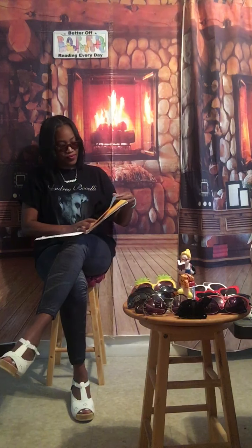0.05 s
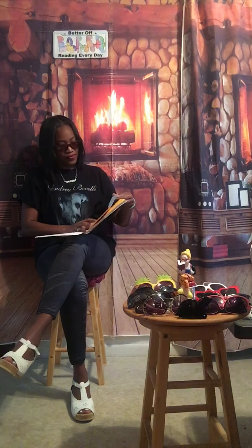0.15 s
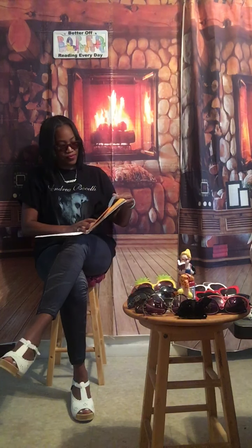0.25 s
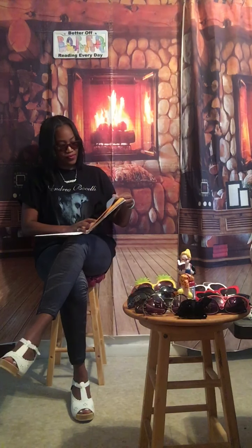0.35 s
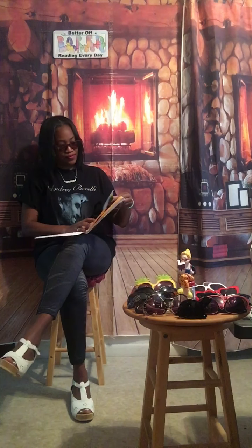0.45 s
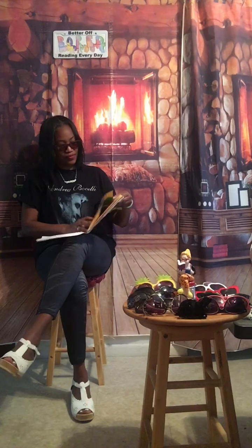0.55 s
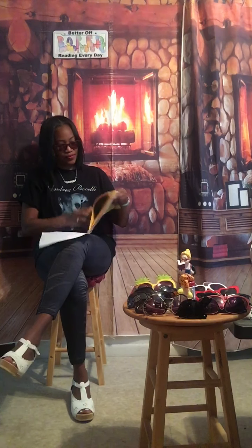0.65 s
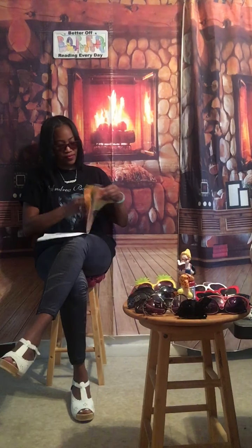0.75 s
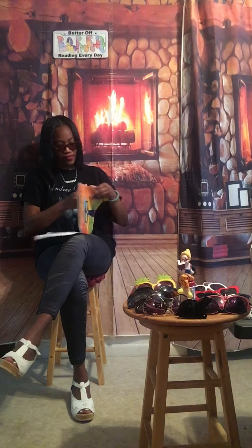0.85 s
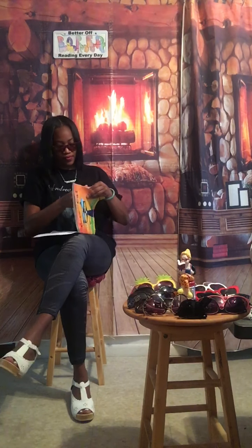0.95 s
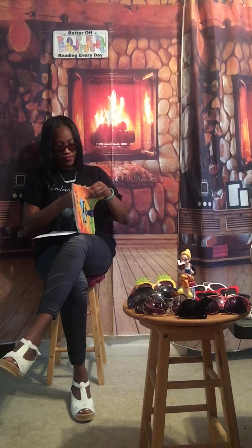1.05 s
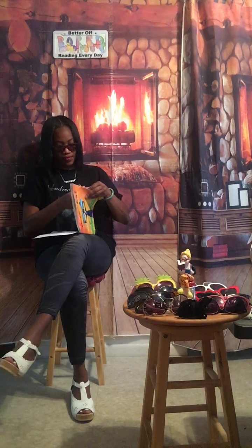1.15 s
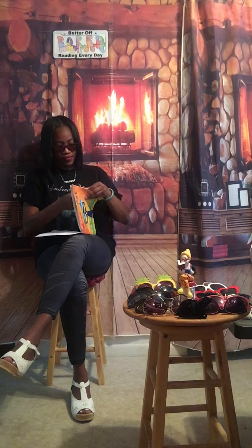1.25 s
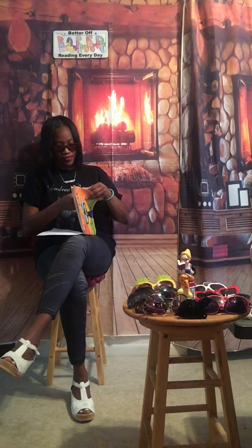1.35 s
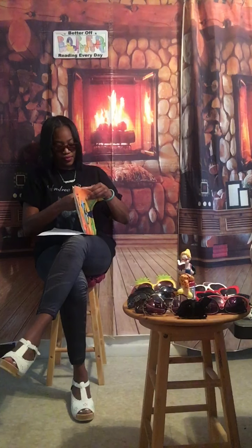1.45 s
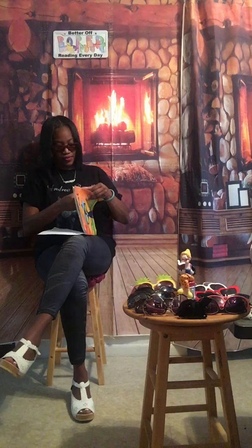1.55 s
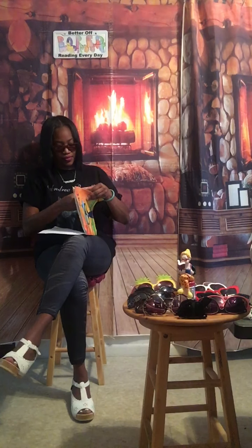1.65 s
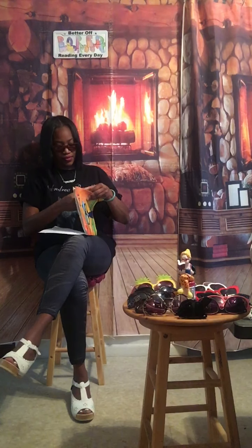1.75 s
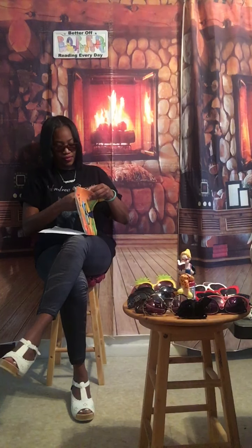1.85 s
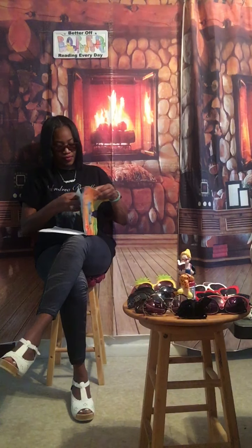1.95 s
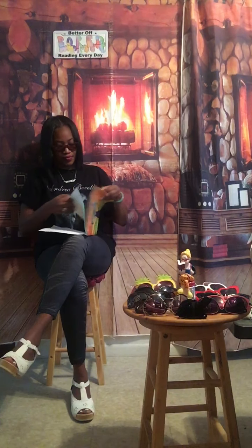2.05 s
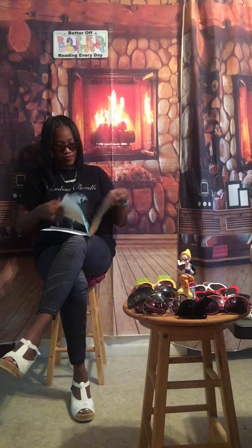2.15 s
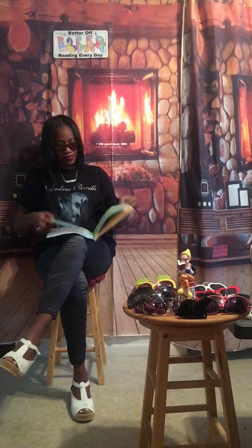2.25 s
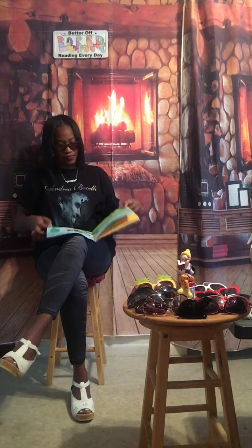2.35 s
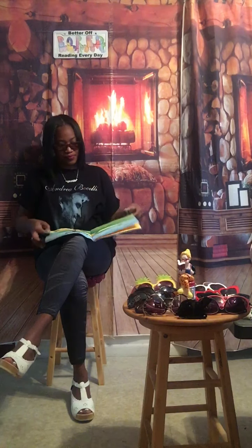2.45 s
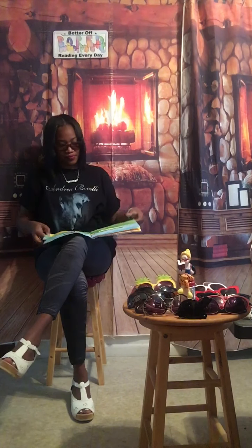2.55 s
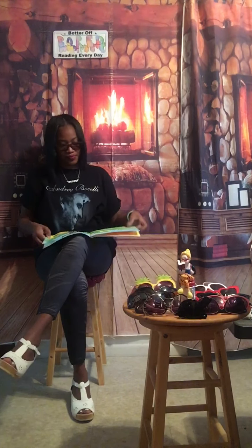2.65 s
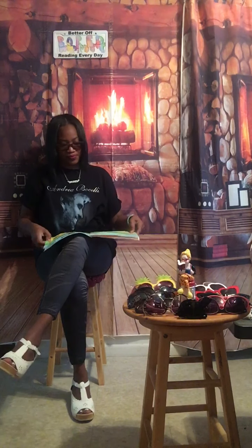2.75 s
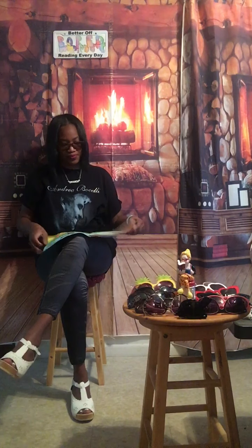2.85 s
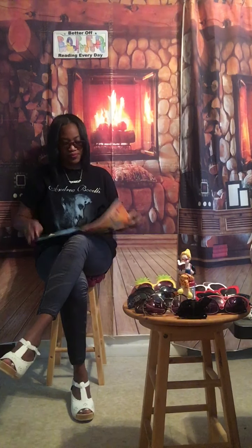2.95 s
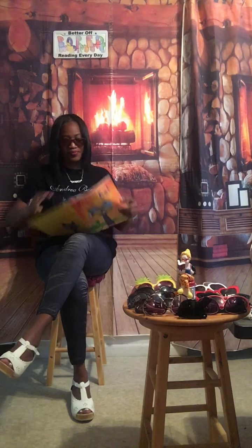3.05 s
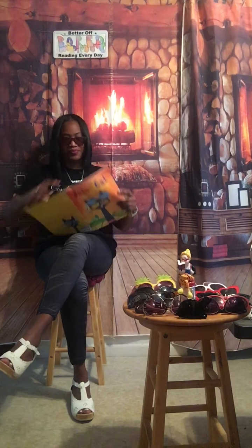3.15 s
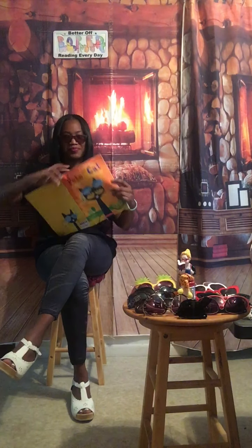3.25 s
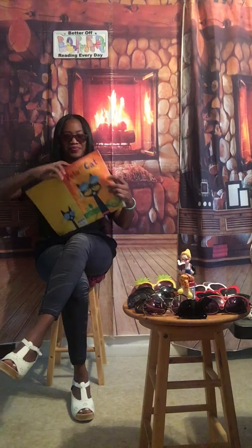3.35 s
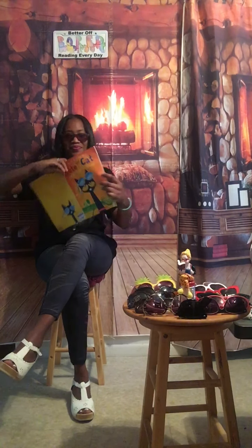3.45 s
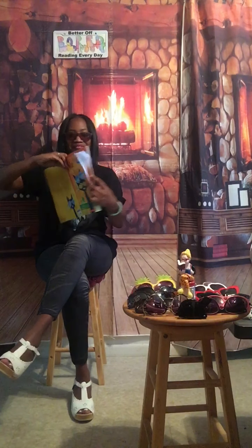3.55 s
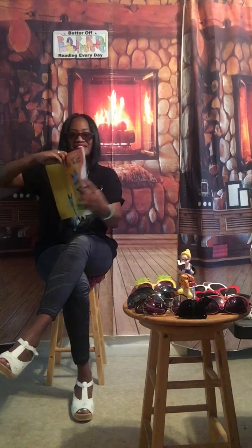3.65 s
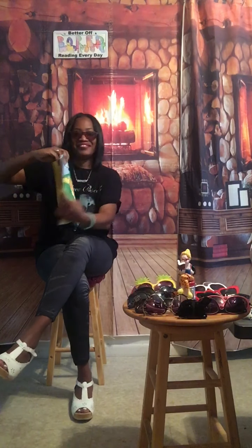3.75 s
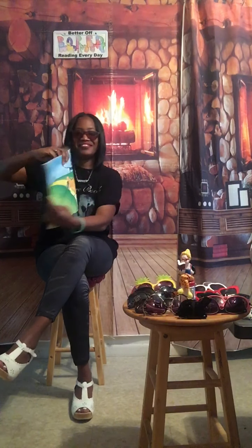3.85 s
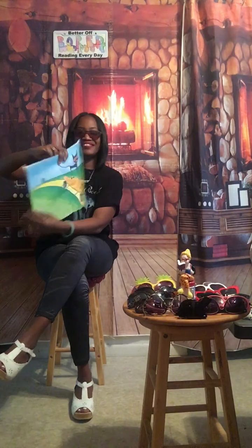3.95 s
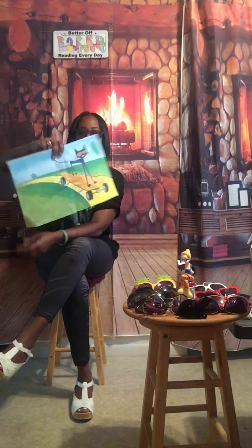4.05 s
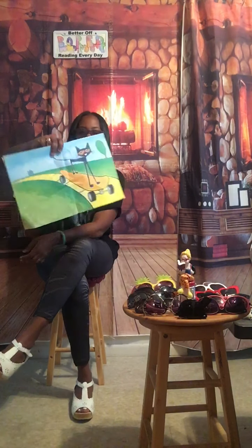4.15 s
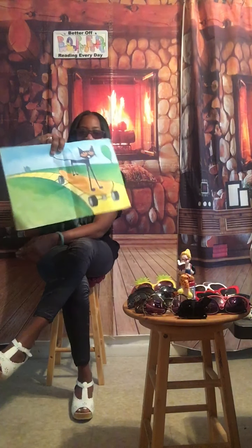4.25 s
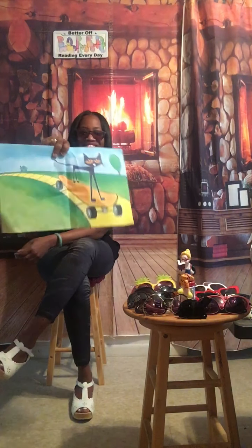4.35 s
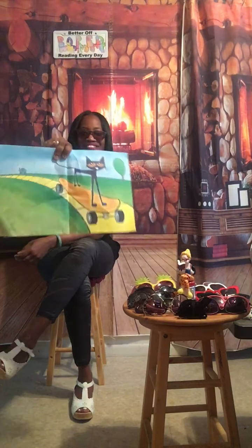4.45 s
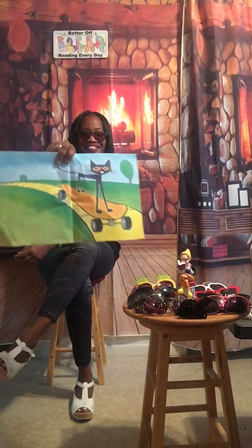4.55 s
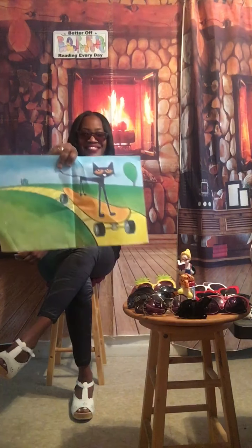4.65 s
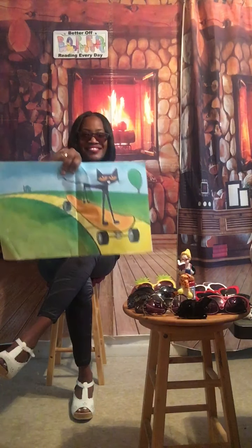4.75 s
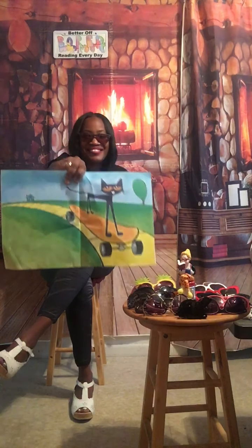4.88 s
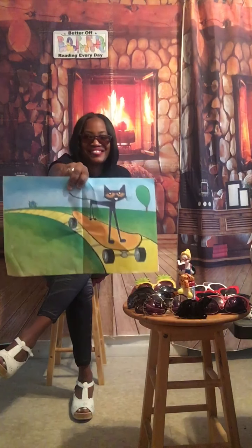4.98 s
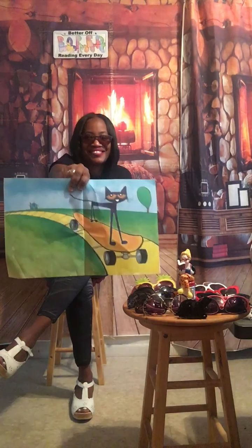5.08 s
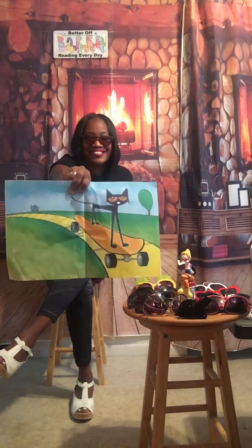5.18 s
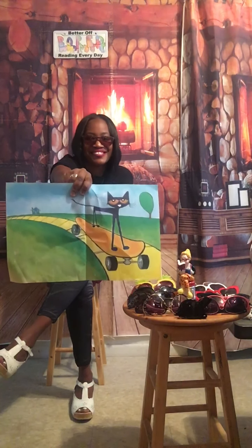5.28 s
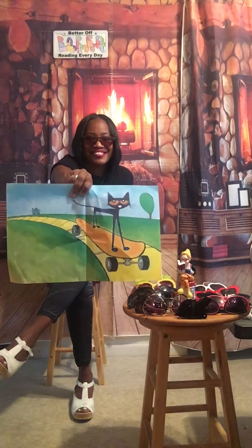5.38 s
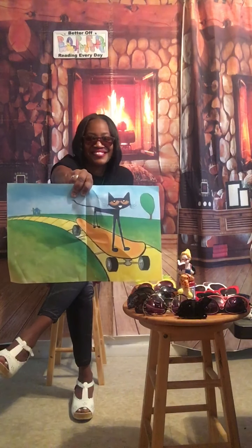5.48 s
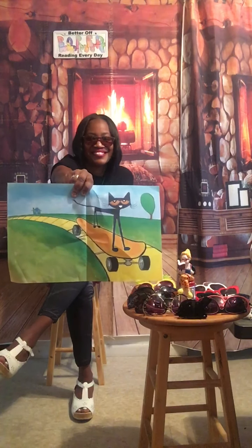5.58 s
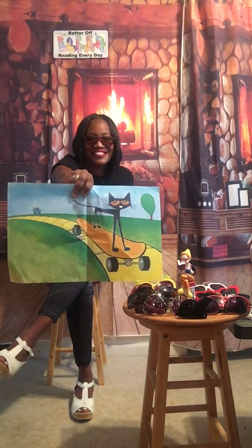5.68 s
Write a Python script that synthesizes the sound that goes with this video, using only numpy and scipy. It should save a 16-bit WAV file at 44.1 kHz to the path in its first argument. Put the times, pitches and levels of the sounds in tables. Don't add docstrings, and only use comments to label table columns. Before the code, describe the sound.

A stiff picture book is leafed through in a small furnished room, heard from a phone a few metres away. Under everything lie a faint distant engine, low mains hum and soft hiss; the engine drone slowly rises until about 2 s, drops, then idles with an uneven, beating level. Faint paper touches begin at 0.3 s, growing into a rustle and one sharp snap near 0.8 s. Only light rubbing follows until about 1.8 s, when a dense group of page snaps, papery sliding and dull cover knocks runs to 2.5 s, strongest around 2.0 to 2.3. More snaps with airy swishes come near 2.8, a fuller flap at 3.1, smaller ones at 3.4, 3.5 and 3.7, then a swelling slide and firm snap with knock at 4.0. A last small flick lands at 4.5, leaving hum and hiss to about 5.7 s. Reflections are short.

```python
import sys
import numpy as np
from scipy import signal
from scipy.fft import rfft, irfft, next_fast_len
from scipy.io import wavfile
from scipy.ndimage import uniform_filter1d

SR = 44100
rng = np.random.default_rng(int(sys.argv[2]) if len(sys.argv) > 2 else 0)


def makeup_ratio(level_db):
    decades = np.asarray(level_db, float) / 20
    return 10 ** decades


def master(y):
    cut = np.clip(np.atleast_2d(y).T, -1, 1)
    pcm = np.round(cut * 32767)
    wavfile.write(sys.argv[1], SR, pcm.astype(np.int16))


N = 252242
SPAN = 16384


def level(x, db):
    return x * makeup_ratio(db) / np.sqrt(np.mean(x ** 2, axis=-1, keepdims=True))


def shape(x, gain):
    n = next_fast_len(x.shape[-1])
    f = np.arange(n // 2 + 1) * SR / n + 1e-3
    return irfft(rfft(x, n) * gain(f), n)[..., :x.shape[-1]]


def ring(f, hz, q):
    return 1 / (1 + 1j * q * (f / hz - hz / f))


def band(f, lo_hz, hi_hz):
    low, high = 1j * f / hi_hz, lo_hz / (1j * f)
    return 1 / ((1 + np.sqrt(2) * low + low ** 2) * (1 + np.sqrt(2) * high + high ** 2))


def walk(rate_hz):
    k = int(SR / rate_hz)
    joined = np.interp(np.arange(N) / k, np.arange(1024), rng.standard_normal(1024))
    return 1.184 * uniform_filter1d(joined, k)


def curves(table):
    s, *columns = np.transpose(table)
    return [np.interp(np.arange(N) / SR, s, c) for c in columns]


def motor():
    # time in seconds, drone in Hz.
    revs = [(0, 73.57), (.3, 75.6), (.6, 77.87), (1, 80.36), (1.6, 82.96), (1.95, 83.34), (2.2, 70.6),
            (2.5, 71.47), (2.82, 72.47), (3.12, 73.26), (3.46, 73.32), (3.9, 73.75), (4.45, 74.18),
            (4.95, 73.24), (5.37, 73.67), (5.72, 73.27)]
    # time in seconds, drone level in dB, upper-order level in dB.
    load = [(0, -55.5, -54), (.3, -56, -55.5), (.62, -57.5, -64.5), (1.15, -61, -70), (1.6, -59.5, -81),
            (1.95, -73, -76.5), (2.25, -57, -72), (2.55, -54.5, -84), (2.82, -64, -55.5), (3.0, -57.5, -65),
            (3.3, -67, -63.5), (3.75, -58.5, -65), (4.2, -55, -63), (4.52, -65.5, -61), (4.85, -56, -57),
            (5.3, -72, -66.5), (5.72, -61.5, -67.5)]
    # pitch in Hz, level in dB.
    overtones = [(242.2, -86), (360.7, -81), (409.1, -102), (479.1, -87.5), (958.2, -87.5)]
    upper_order, side_order, beat_turns = 1.6, 1.4, 0.39
    mains_hz, hum_db, rumble_db, wash_db, side_db = 120, -60, -63.5, -67.5, -8.5
    (hz,), (drone_db, upper_db) = curves(revs), curves(load)
    t, turns = np.arange(N) / SR, np.cumsum(hz) / SR

    drone = np.sin(2 * np.pi * turns) * makeup_ratio(drone_db + 2.5 + 1.6 * walk(12))
    upper = np.sin(2 * np.pi * (upper_order * turns + beat_turns))
    upper = upper + makeup_ratio(side_db + 1.5 * walk(6.3)) * np.sin(2 * np.pi * side_order * turns)
    upper = upper * makeup_ratio(upper_db + 1.0 + 0.75 * walk(5.3))
    hum = np.sin(2 * np.pi * mains_hz * t) * makeup_ratio(hum_db)

    rumble = shape(rng.standard_normal(N), lambda f: ring(f, 58.1, 7.9) ** 2)
    wash = shape(rng.standard_normal(N), lambda f: ring(f, 90, 1.56) ** 2 + 0.5 * ring(f, 45, 1.6) ** 2)
    flutter = makeup_ratio(2 + 2.06 * walk(11.0))
    whine = flutter * sum(np.sin(2 * np.pi * f * t) * makeup_ratio(db) for f, db in overtones)
    return drone + upper + hum + level(rumble, rumble_db) + level(wash, wash_db) + whine


def air():
    # frequency in Hz, density in dB per Hz.
    spectrum = [(140, -46), (170, -31.5), (240, -27.5), (340, -28), (450, -32), (800, -38), (1000, -37),
                (1300, -38), (3000, -42), (6500, -46.5), (8000, -45), (14000, -47), (15600, -48.5)]
    hz, db = np.transpose(spectrum)
    hiss = shape(rng.standard_normal(N), lambda f: makeup_ratio(np.interp(np.log(f), np.log(hz), db, left=-70)))
    return level(hiss, -67.5) * makeup_ratio(0.4 * walk(3))


def crackle(size, spread_db):
    return rng.standard_normal(size) * makeup_ratio(spread_db * rng.exponential(size=size))


def creases(lo_hz, hi_hz, count):
    place_in_band = (np.arange(count) + rng.random(count)) / count
    hz = lo_hz * (hi_hz / lo_hz) ** place_in_band[:, None]
    clicks = (rng.random((count, N)) < 45 / SR) * crackle((count, N), spread_db=3.0)
    return shape(clicks, lambda f: ring(f, hz, hz / 110)).sum(axis=0)


def contact(hz):
    # firmest
    # contact in seconds, level in dB, build-up in seconds, dying-away in seconds, brightness in octaves re 1
    # kHz.
    strokes = [(0.475, -63.5, 0.13, 0.13, 0.1), (0.6, -52.5, 0.12, 0.096, 0.46),
               (0.7, -51.5, 0.13, 0.3, 1.3), (0.795, -47, 0.044, 0.19, 0.5), (0.99, -63, 0.12, 0.13, 0.5),
               (1.27, -64.5, 0.42, 0.45, 1), (1.842, -45.5, 0.029, 0.076, 1.5),
               (1.96, -57, 0.071, 0.32, -.2), (2.1, -53.5, 0.16, 0.07, 0),
               (2.26, -44.5, 0.077, 0.13, -0.03), (2.36, -46.5, 0.085, 0.14, 0.13),
               (2.66, -62.5, 0.36, 0.3, 1.5), (2.8, -50.5, 0.087, 0.087, 2), (2.87, -52, 0.081, .2, 0.7),
               (3.05, -55.5, 0.12, 0.3, 1), (3.17, -59, .1, 0.25, 1.5), (3.4, -53, 0.02, 0.075, 1.35),
               (3.44, -62, 0.091, 0.13, 2.5), (3.5, -55.5, 0.1, 0.31, 0.7), (3.63, -59, 0.21, 0.31, 1.34),
               (3.86, -57, 0.32, 0.26, 1.5), (3.979, -49.5, 0.33, 0.053, 0.6),
               (4.049, -51.5, 0.14, 0.062, 1.5), (4.18, -64.5, 0.16, 0.11, -0.6),
               (0.39, -68, 0.052, .05, 1),
        (0.524, -57, 0.028, 0.046, 0.5),
        (2.77, -52.5, .03, .2, 4),
        (3.42, -62, .03, 0.053, 4.5),
        (4.25, -67, 0.016, 0.07, -0.5),
        (2.45, -55.5, .03, 0.03, -1.2),
        (0.58, -64, .03, .12, 3.5),
        (3.26, -61, 0.091, 0.12, 3.5),
    ]
    range_db, rounding = 20, 1.166
    duller_db_per_oct, brighter_db_per_oct = 5.5, 4.5
    s, db, rise_s, fall_s, octaves = np.transpose(strokes)[..., None]
    grid = np.arange(0, N + 64, 64)
    late_s, off = grid / SR - s, np.log2(hz / 1000) - octaves
    swell_db = -range_db * np.maximum(late_s / np.abs(fall_s), -late_s / np.abs(rise_s)) ** rounding
    colour_db = -np.maximum(brighter_db_per_oct * off, -duller_db_per_oct * off)
    power = (makeup_ratio(db + swell_db + colour_db) ** 2).sum(axis=0)
    return np.interp(np.arange(N), grid, np.sqrt(power))


def slide():
    edges_hz = [250, 700, 2000, 5000, 9000, 15500]
    grit = crackle(N, spread_db=2.1) * makeup_ratio(1.5 * walk(90))
    smear = rng.standard_normal(N) * np.sqrt(uniform_filter1d(grit ** 2, 1000, origin=499))
    out = 0
    for lo, hi in zip(edges_hz, edges_hz[1:]):
        layer = shape(grit + 0.92 * smear, lambda f: band(f, lo, hi) / (1 + 1j * f / 6000))
        layer = level(layer, 1) + level(creases(lo, min(hi, 9000), count=3), -19)
        out = out + layer * contact(np.sqrt(lo * hi)) * makeup_ratio(walk(70))
    return out


def burst(ms):
    # delay in ms, level in dB.
    echoes = [
        (5.5, -5),
        (10, -9),
        (19, -9),
        (24, -13),
    ]
    room_t60_s, room_top_t60_s, room_db = 0.26, 0.22, -3
    count, t = len(ms), np.arange(SPAN) / SR
    length_ms = np.maximum(ms, 0.3)
    age = t * 1000 / length_ms
    run = crackle((count, SPAN), spread_db=2.37) * (1 - np.exp(-age / 0.29)) * np.exp(-(age / 1.7) ** 2)

    dense = crackle((count, SPAN), spread_db=1.5) * (1 - np.exp(-t / 0.0058))
    low = shape(dense, lambda f: 1 / (1 + 1j * f / 2500))
    tail = low * makeup_ratio(-60 * t / room_t60_s) + (dense - low) * makeup_ratio(-60 * t / room_top_t60_s)
    heard = run + level(tail, room_db) * np.sqrt(np.mean(run ** 2, axis=1, keepdims=True))
    for lag_ms, db in echoes:
        late = np.maximum(age - lag_ms / length_ms, 0)
        envelope = (1 - np.exp(-late / 0.12)) * np.exp(-late)
        heard = heard + makeup_ratio(db) * crackle((count, SPAN), spread_db=2.0) * envelope
    return np.array([run, heard])


def crest(x):
    return 2 * np.sqrt(uniform_filter1d(x ** 2, size=88, axis=1).max(axis=1, keepdims=True))


def place(s, db, gain, runs):
    direct, heard = shape(runs, gain)
    out = np.zeros(N + SPAN)
    for start, one in zip((s[:, 0] * SR).astype(int), heard * makeup_ratio(db) / crest(direct)):
        out[start:start + SPAN] += one
    return out[:N]


def snaps():
    # start in seconds, peak in dB, ringing pitch in Hz, breadth in octaves,
    # crispness in dB re peak.
    buckles = [(0.309, -47, 1700, 0.69, -16), (0.777, -25, 2330, 0.97, -21), (1.459, -51.5, 2100, 1.1, -12),
               (1.776, -47, 1400, 0.8, -23), (1.968, -35.5, 2070, 0.66, -30),
               (2.04, -28.5, 2100, 1.57, -1.5), (2.243, -38, 1750, 0.45, -16),
               (2.256, -26, 1220, 0.91, -48), (2.343, -37, 2670, 0.22, -21),
               (2.441, -41.5, 1090, 0.88, -29), (2.818, -33.5, 3000, 0.7, -16),
               (2.913, -41, 1800, 0.65, -20), (3.103, -28.5, 1010, 0.91, -29),
               (3.369, -40, 1700, 1.35, -13), (3.504, -34, 1910, 0.33, -43),
               (3.689, -36, 1360, 0.25, -21.5), (3.891, -35.5, 1230, 1.3, -11),
               (4.004, -27, 1260, 1.5, -48), (4.537, -40.5, 1820, 0.72, -19)]
    # start in seconds, peak in dB, ringing pitch in Hz,
    # crispness in dB re peak, length in ms.
    shuffles = [(0.457, -50, 2300, -8, 14), (0.486, -45.5, 1610, -16, 7.9), (0.562, -44, 2160, -9.5, 12),
                (0.658, -48, 2020, -15, 7.1), (1.829, -28.5, 2100, -4.5, 5.7), (1.941, -44, 1890, -28, 9.3),
                (2.042, -29, 1360, -6.5, 5.6), (2.059, -33.5, 1530, -15, 4.4),
                (2.208, -29, 1480, -20.5, 7.1), (2.298, -35, 1610, -31, 6.3),
                (2.369, -41.5, 2030, -25, 4.2), (2.715, -46.5, 1323, -16, 5.1),
                (2.834, -33.5, 2500, -18, 2.6), (3.457, -49, 2920, -12, 6.3), (3.949, -38, 1250, -21, 3.2),
                (4.155, -49, 800, -15, 5.4)]
    snap_ms, shuffle_octaves = 2.6, 0.63
    rows = [(*row, snap_ms) for row in buckles]
    rows += [(s, db, hz, shuffle_octaves, crisp_db, ms) for s, db, hz, crisp_db, ms in shuffles]
    s, db, hz, octaves, crisp_db, ms = np.transpose(rows)[..., None]
    runs, wide = burst(ms), 2 ** np.maximum(octaves, 0.2)

    def sheet_gain(f):
        return (ring(f, hz, 6.8) + 1.06) * band(f, hz / wide, hz * wide) / (1 + 1j * f / (5.0 * hz * wide)) ** 2

    sheet = place(s, db - 3.0, sheet_gain, runs)
    crisp = place(s, db + crisp_db + 3, lambda f: band(f, 3200, 6800) + 0.16 * band(f, 7000, 12500), runs)
    return sheet + crisp


def knocks():
    # start in seconds, peak in dB, pitch in Hz, length in ms.
    blows = [(0.563, -57, 656, 5.2), (0.778, -64, 746, 4), (1.831, -43.5, 600, 4.1),
             (2.043, -42.5, 510, 1.1), (2.211, -44.5, 468, 6.7), (2.244, -28, 628, 4.2),
             (2.257, -45, 678, 4.7), (2.367, -38, 610, 8.1), (2.399, -38, 630, 2.5), (2.45, -47, 620, 2.7),
             (2.622, -51.5, 610, 2), (2.817, -42.5, 630, 9.1), (2.835, -42.5, 560, 3.2),
             (3.103, -35.5, 422, 5), (3.369, -43, 426, 2.4), (3.504, -46, 480, 5.1), (3.689, -49, 451, 3),
             (3.955, -41, 517, 2.7), (4.005, -31.5, 424, 1.9), (4.154, -66, 442, 4.2),
             (4.206, -50.5, 370, 4.8), (4.239, -68, 480, 2.2), (4.433, -57, 640, 3.6),
             (4.538, -48, 328, 8.4)]
    s, db, hz, ms = np.transpose(blows)[..., None]
    return place(s, db - 1.0, lambda f: ring(f, hz, 6.7) * band(f, 0.27 * hz, 4.2 * hz), burst(ms))


def scene():
    # pitch in Hz, width in Hz, boost in dB.
    modes = [(354.6, 10.7, 8.5), (454, 12, 3), (678, 15, 5), (864, 6.6, 3.5), (955, 13.4, 5), (1070, 15, 3),
             (1230, 66, 4), (1560, 19, 6.5), (1700, 13, 7.5), (1994, 86, 6), (2460, 13.5, 8.5),
             (2790, 140, 5.5), (3190, 81, 5), (3900, 90, 3.5), (5430, 93, 2.5)]
    distant = motor() + air()
    paper = slide() + snaps() + knocks()
    book = shape(paper, lambda f: 1 + sum((makeup_ratio(db) - 1) * ring(f, hz, hz / width) for hz, width, db in modes))
    return (book * makeup_ratio(-0.3) + distant)[None]


def low_pass(x):
    return signal.sosfilt(signal.butter(12, 15780, fs=SR, output="sos"), x)


def record(dry):
    # centre in Hz, width in Hz, gain in dB.
    port = [
        (4870, 340, -5),
        (6120, 7400, 2.5),
        (7910, 1930, -7.5),
        (10320, 1700, -8),
        (14650, 8100, -10.5),
    ]
    top_hz = 15780

    def port_gain(f):
        db_sum = sum(db / (1 + (2 * (f - hz) / width) ** 2) for hz, width, db in port)
        return makeup_ratio(db_sum) * (f < top_hz)

    return low_pass(shape(dry, port_gain))


dry = scene()
out = record(dry)
master(out)
```